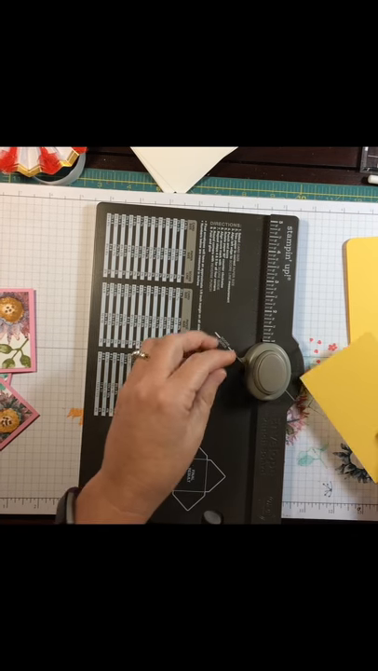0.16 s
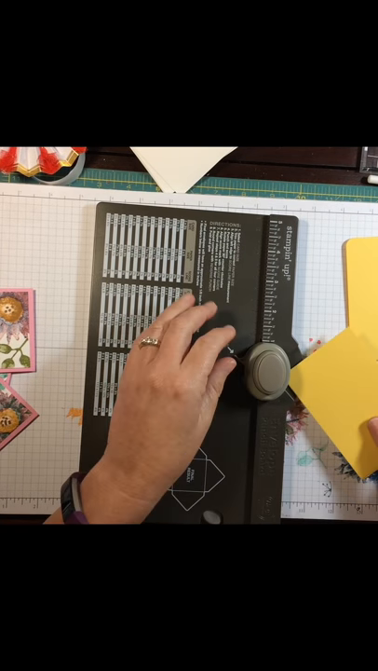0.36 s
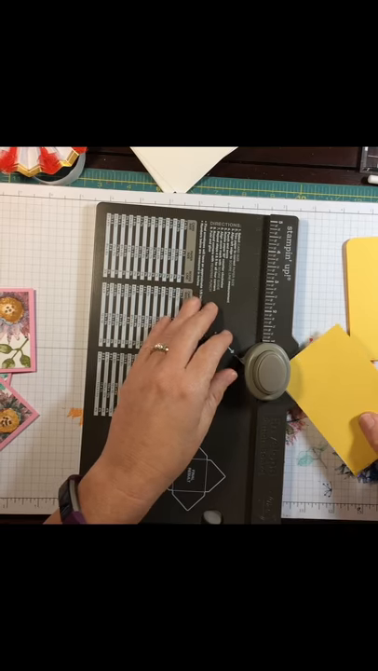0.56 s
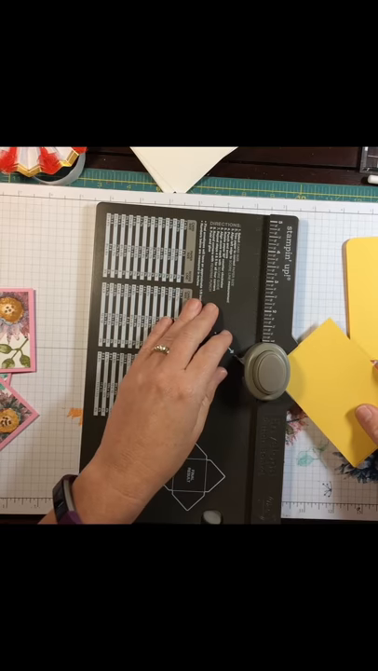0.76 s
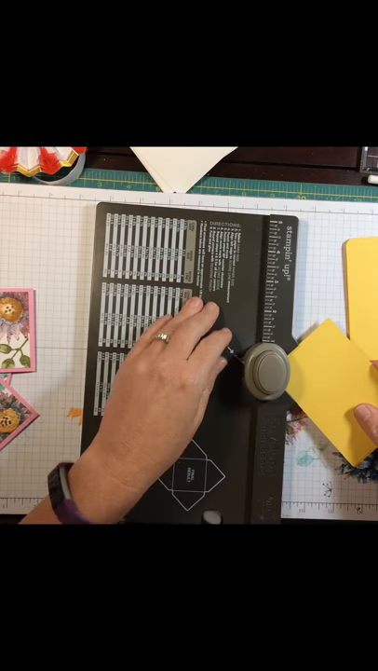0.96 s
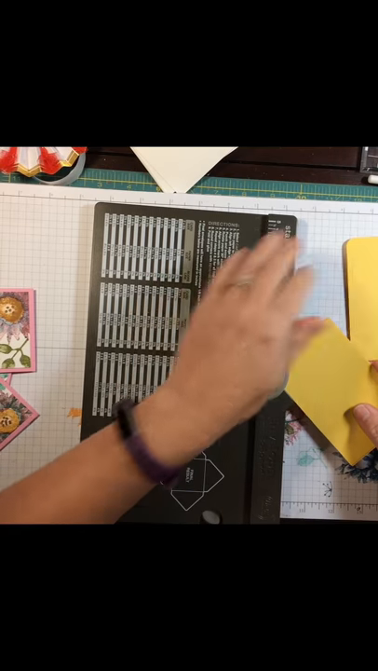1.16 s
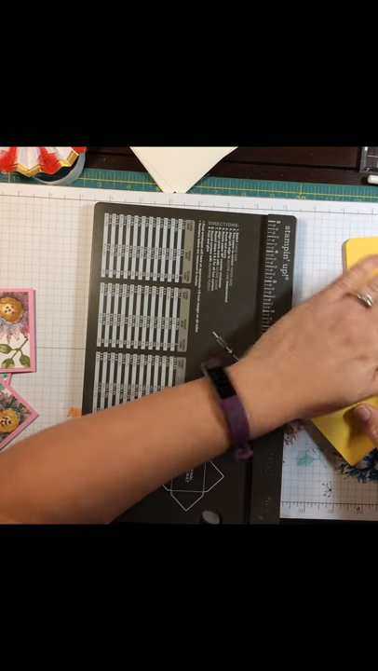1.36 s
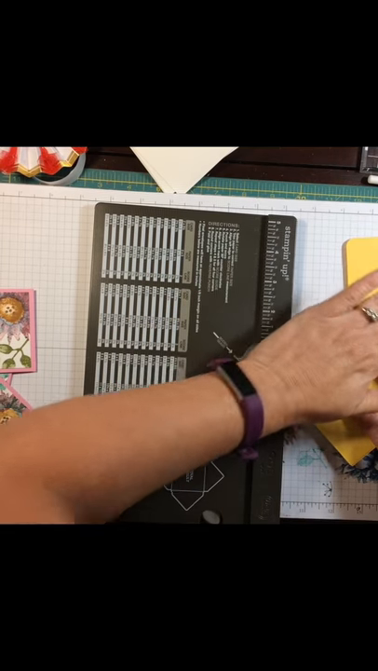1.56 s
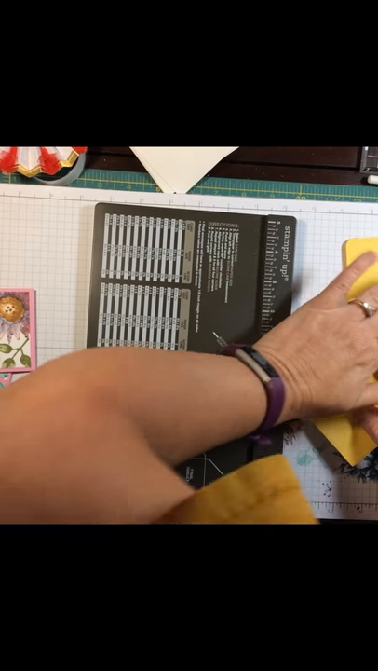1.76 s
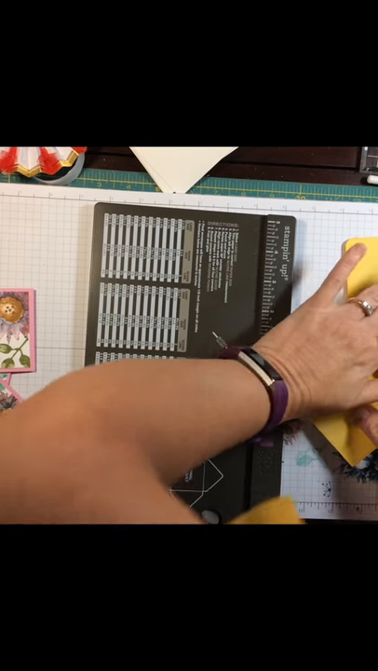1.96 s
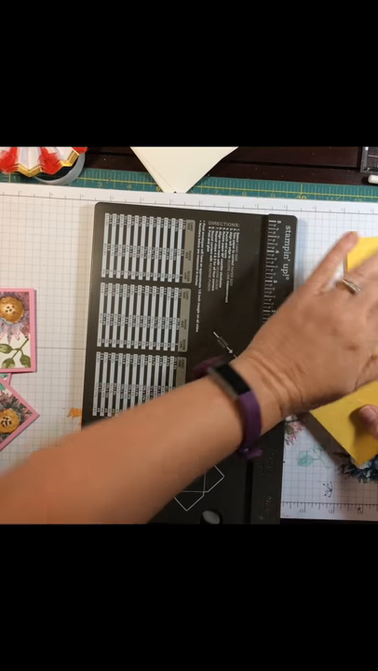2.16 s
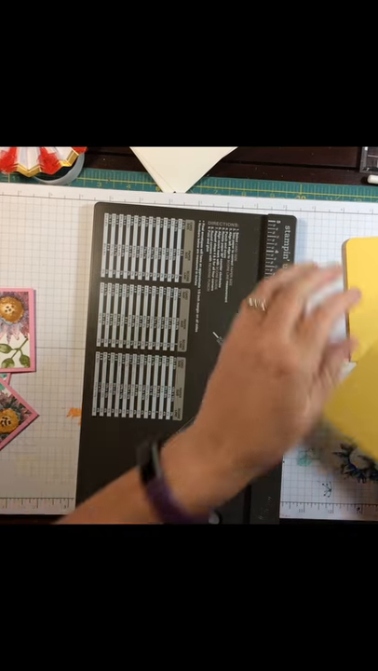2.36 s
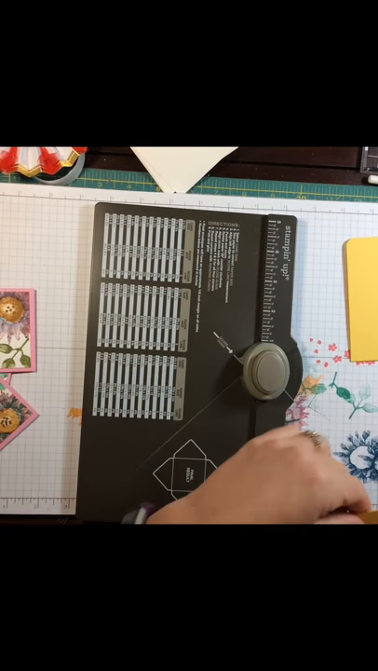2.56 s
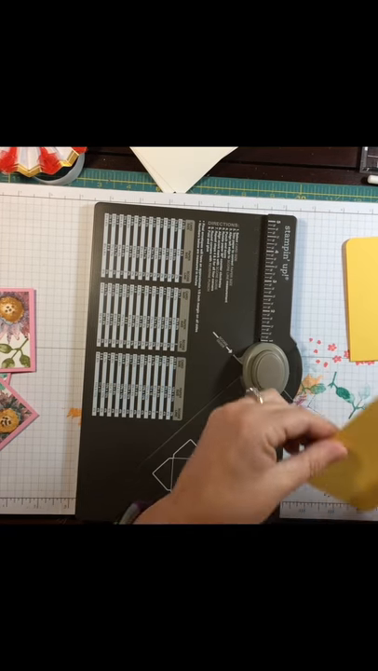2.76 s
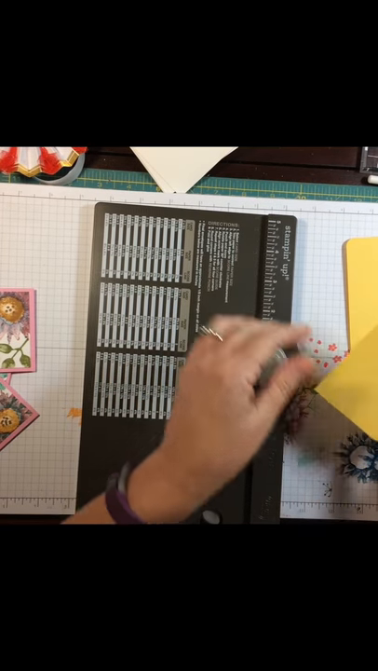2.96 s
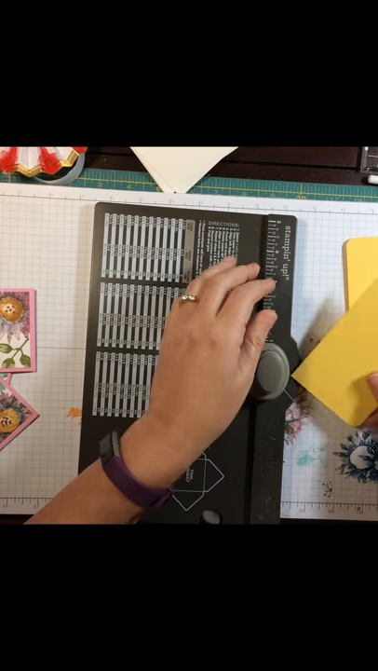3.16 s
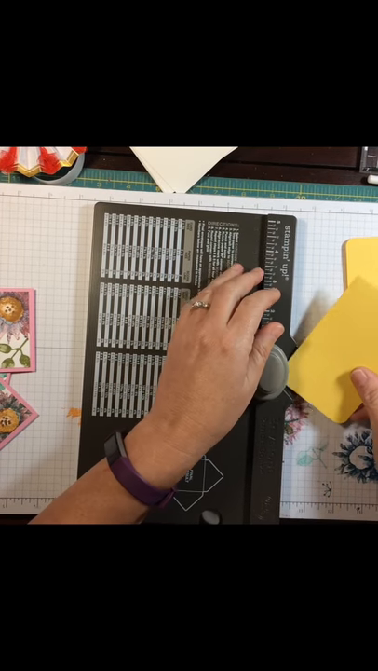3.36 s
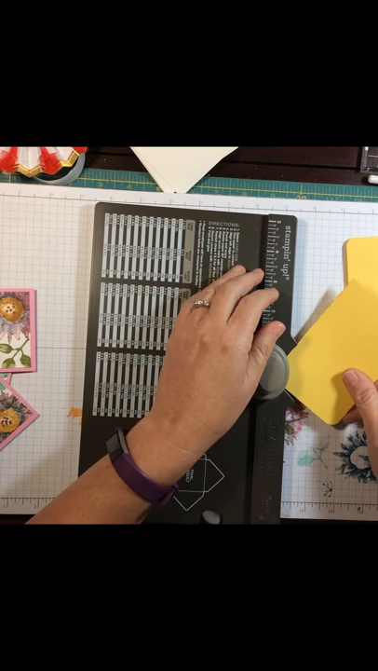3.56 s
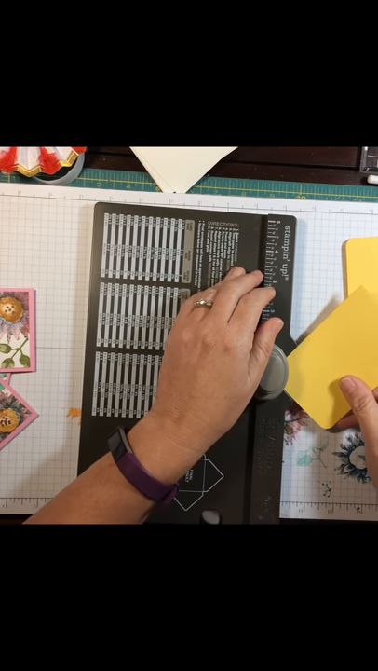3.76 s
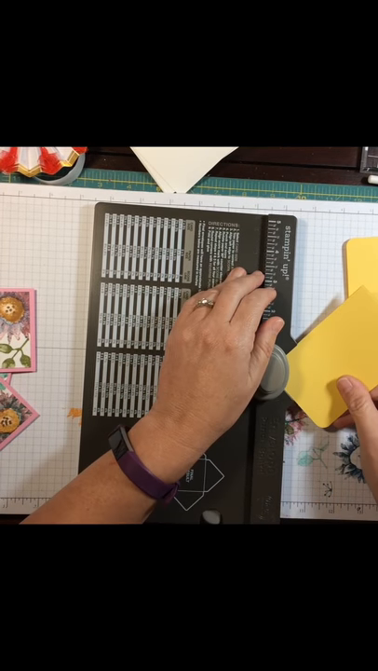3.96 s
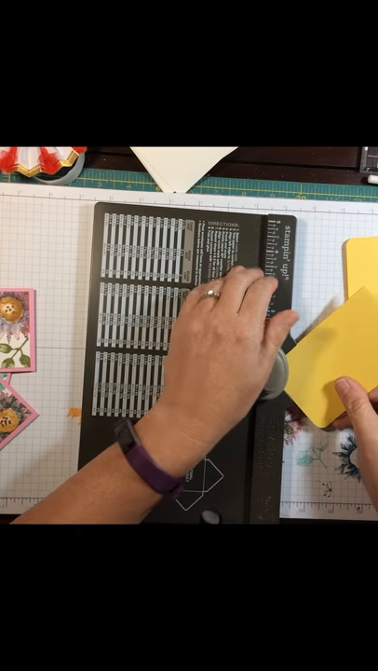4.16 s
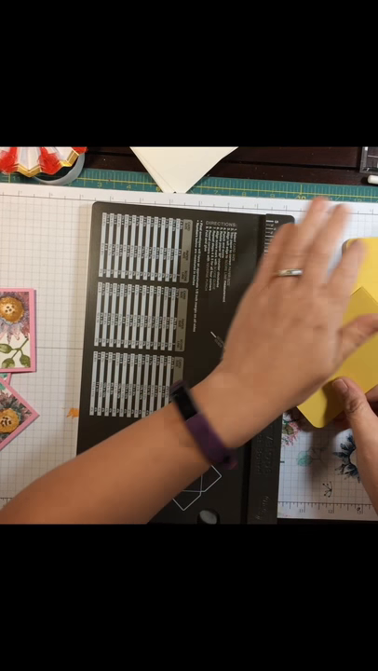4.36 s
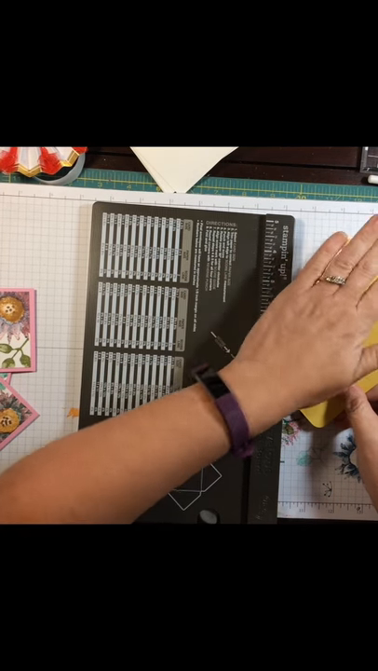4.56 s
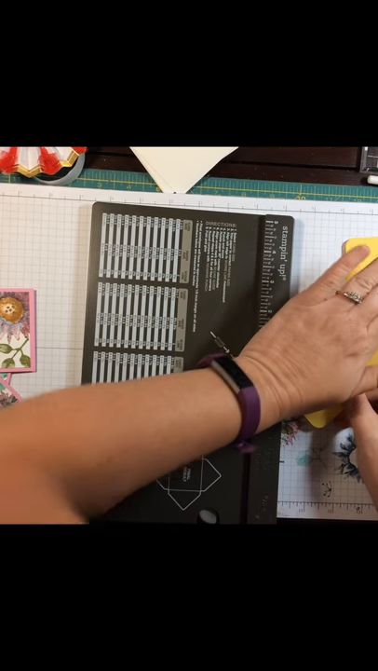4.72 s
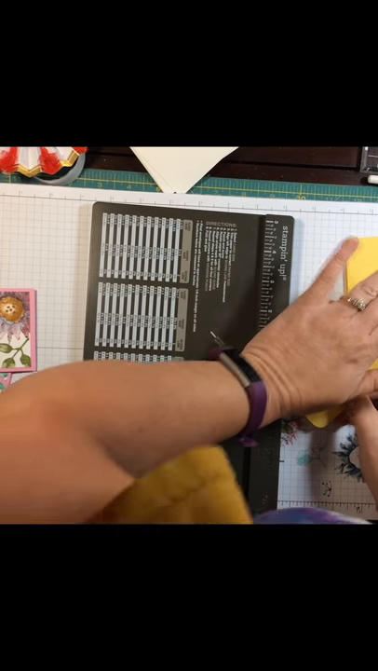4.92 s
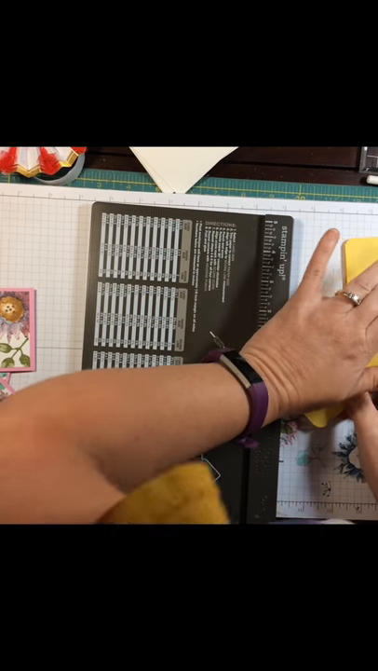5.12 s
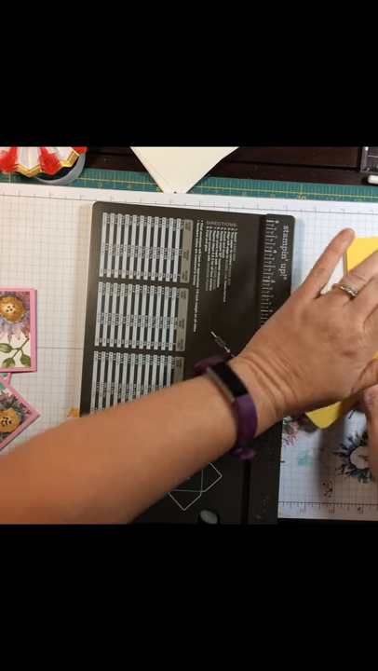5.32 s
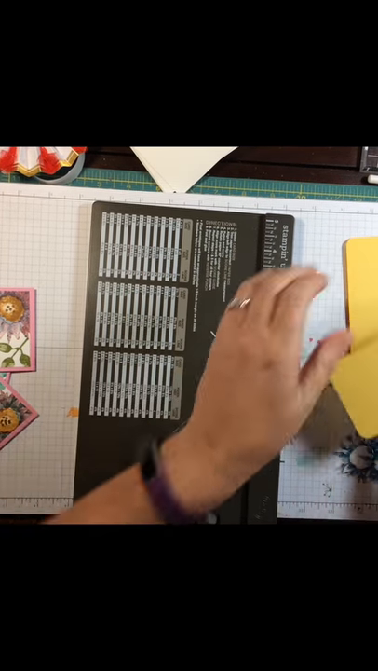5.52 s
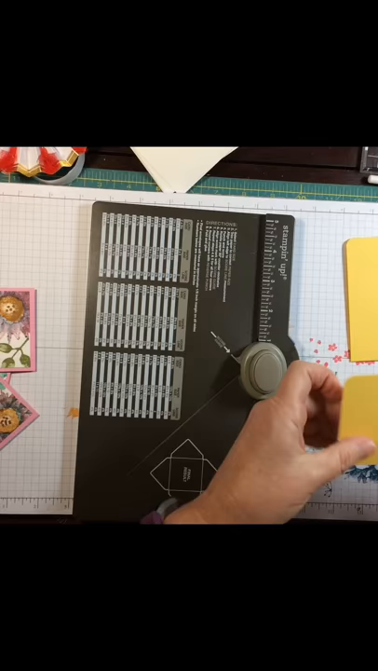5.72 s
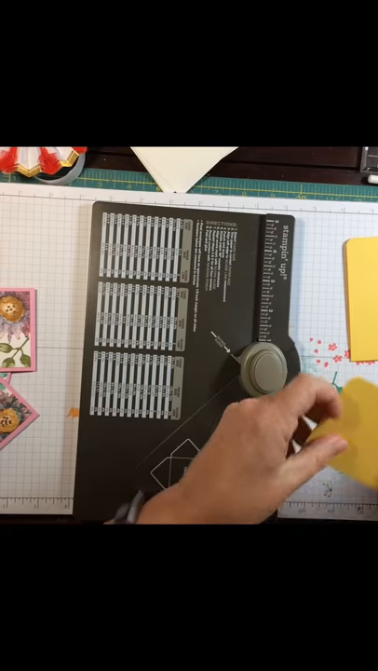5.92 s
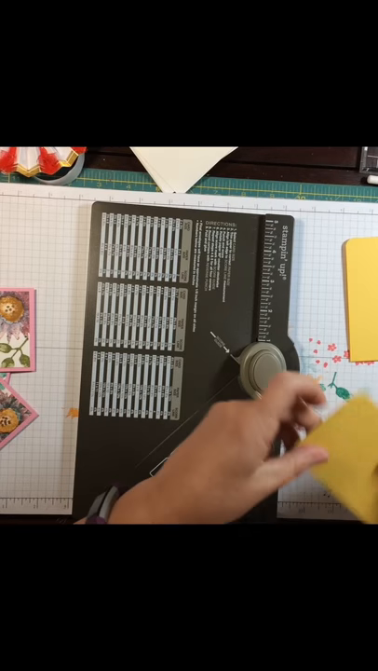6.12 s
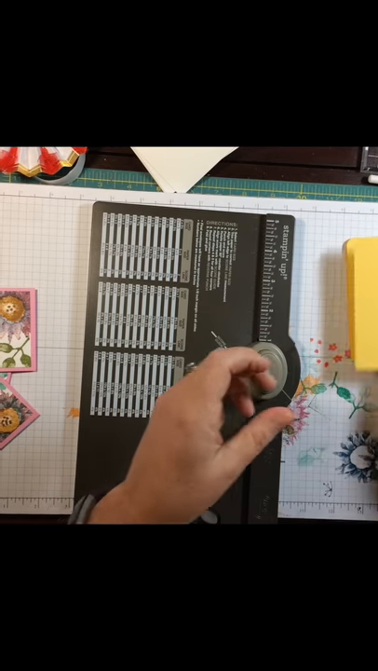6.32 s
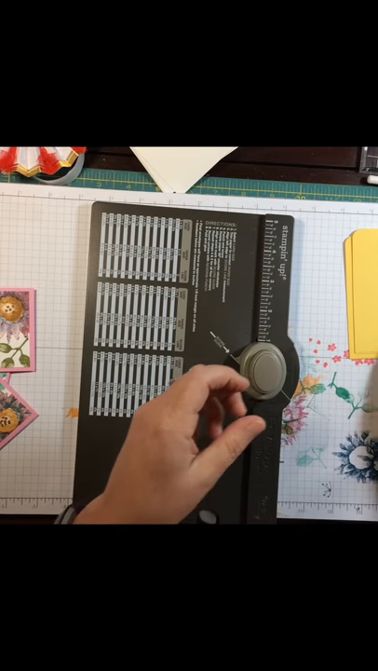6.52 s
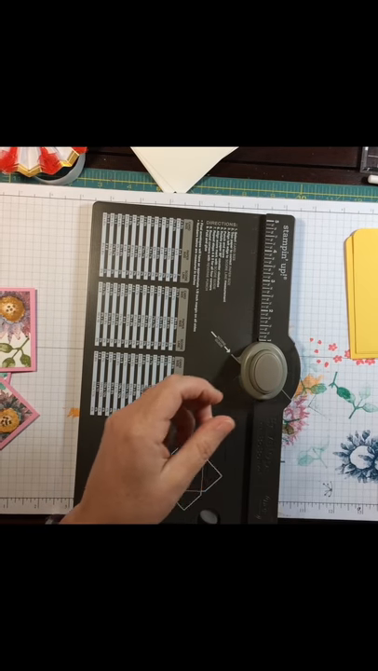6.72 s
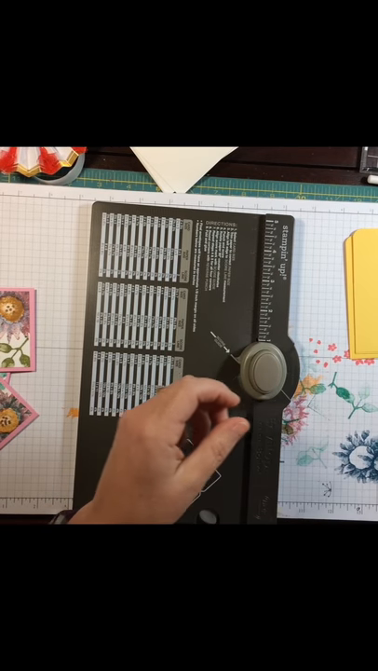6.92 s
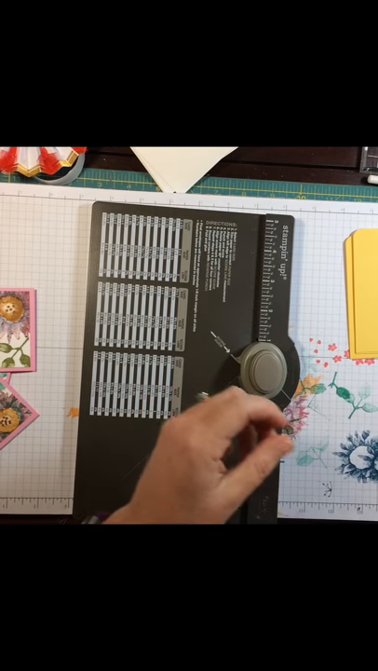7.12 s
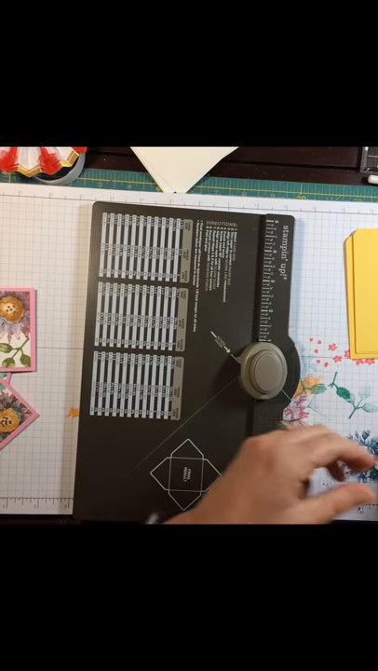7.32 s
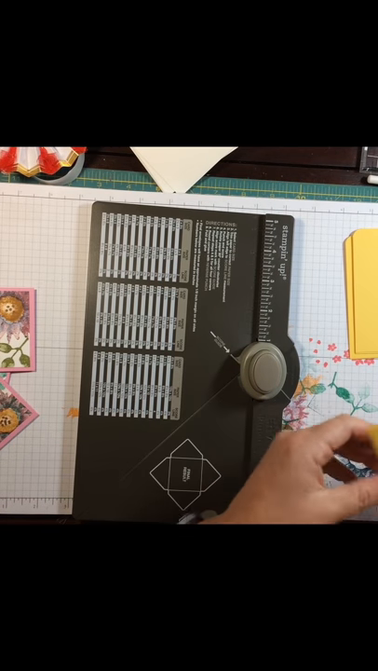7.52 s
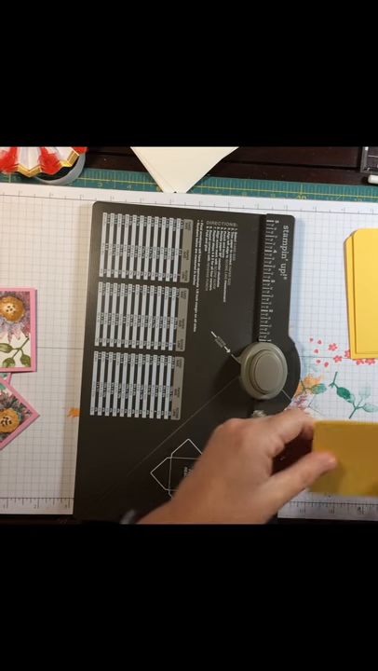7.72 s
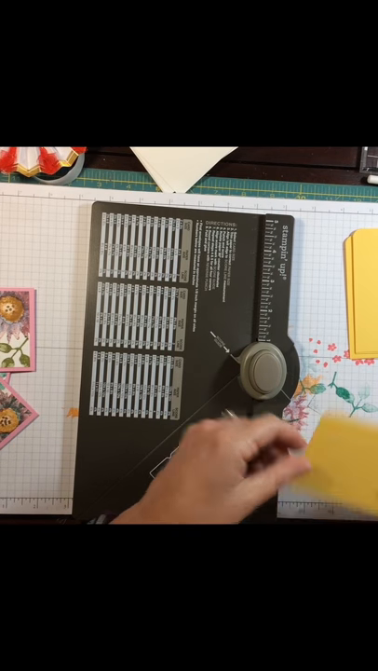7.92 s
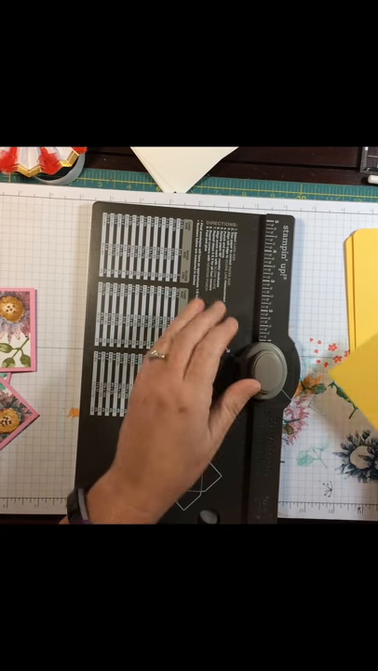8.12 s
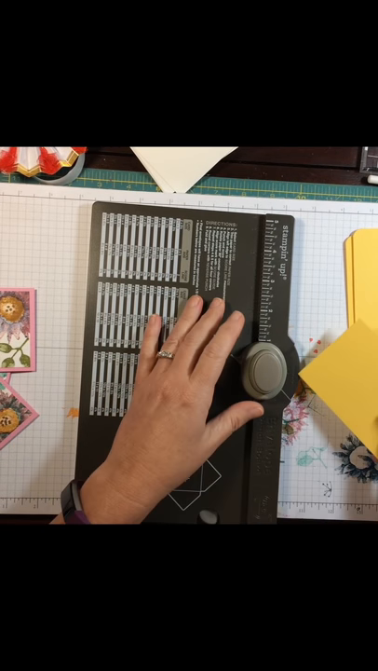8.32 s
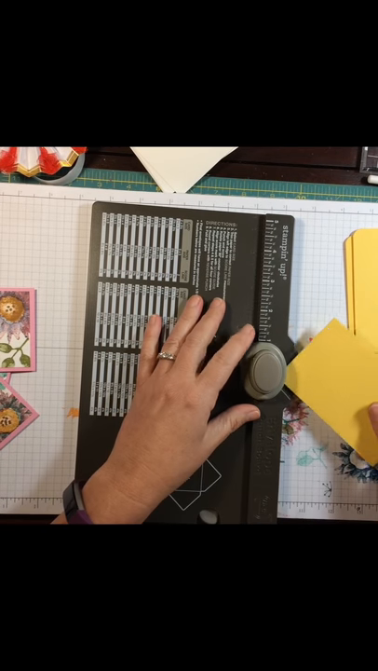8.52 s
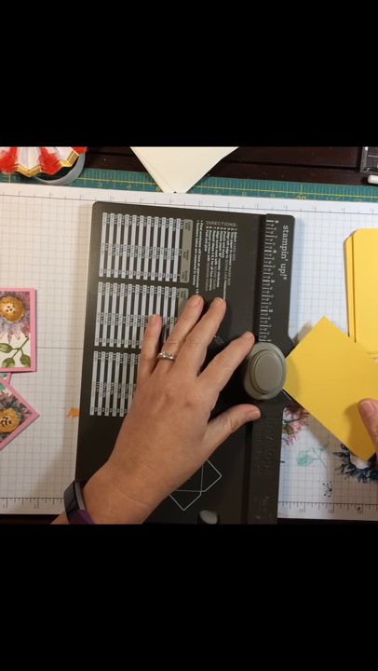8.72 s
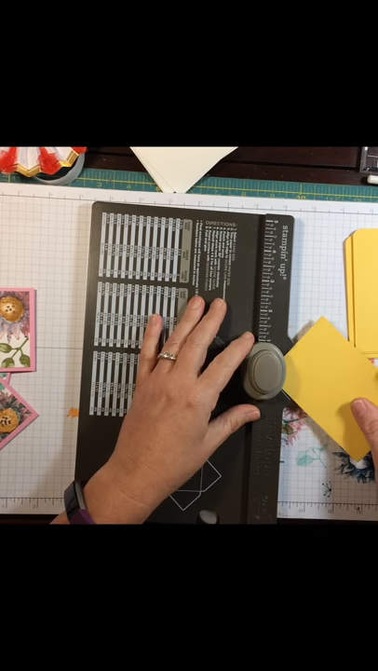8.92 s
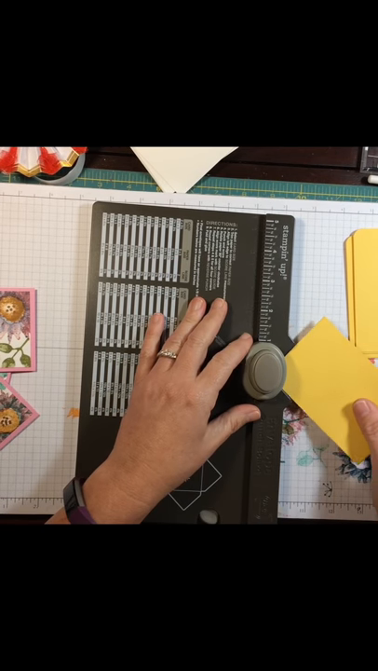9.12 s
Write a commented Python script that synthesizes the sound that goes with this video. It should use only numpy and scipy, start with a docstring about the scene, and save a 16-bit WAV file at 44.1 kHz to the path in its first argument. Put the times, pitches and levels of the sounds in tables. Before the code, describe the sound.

On a craft table in a small room, heard close up, card slides and bumps softly against a plastic board. Fingers knock dully, then a punch cracks sharply through the card with a table thud, and its button clicks back. More bumps lead to a second punch and click. Afterwards card lands on a pile, another peels off with a crackly rub, and a corner snaps brightly against the guide. Low rumble and faint hiss lie beneath.

```python
"""On a craft table in a small room, a plastic corner punch board works close to one microphone.
Twice a hand leans on the button, the die snaps through card, hits its stop and springs back up.
Around this, card slides, taps, peels off a pile and snaps off the guide, over low rumble and faint hiss.
Decaying sine waves ring the plastic, the guide and the table; filtered noise makes the cracks, rubs and hisses."""
import sys
import numpy as np
from scipy import signal
from scipy.fft import rfft, irfft
from scipy.io import wavfile
from scipy.ndimage import uniform_filter1d

SR = 44100
rng = np.random.default_rng(int(sys.argv[2]) if len(sys.argv) > 2 else 0)


def wav_record(signal):
    """Record a signal, one row per channel, as 16-bit PCM in the file named by sys.argv[1]."""
    frames = np.transpose(np.atleast_2d(signal))
    bounded = np.clip(frames, -1, 1)
    # unit amplitude maps onto the largest positive 16-bit level
    quanta = np.round(bounded * 32767).astype(np.int16)
    wavfile.write(sys.argv[1], SR, quanta)


N = 404838
TIME = np.arange(N) / SR  # s, over the whole scene
RING_SAMPLES = 16384  # length of one hit
AGE = TIME[:RING_SAMPLES]  # s since a hit began

# the die hits its stop: t/s, level/dB, time from cut to stop/s, crack level/dB, tuning of the board (factor)
PUNCH_STOPS = [(1.8242, -17, .0033, -5.5, 1.0), (5.0113, -18.3, 0.005, -1.1, 1.02)]
# card and hand come down on the pile: t/s, thud/dB, slap/dB, settling/dB, resonance of the pile f/Hz
PILE_LANDINGS = [(6.5767, -38.5, -46.5, -51, 328), (7.243, -71, -57.5, -54, 201)]
# ways the plastic board rings: f/Hz, level/dB, time to fade by 60 dB/s
BOARD_MODES = [(145, -2.5, .04), (228, -6.5, 0.059), (314, -4.5, .035), (394, -1.5, .04), (448.1, 0, 0.049),
               (525, 0.5, 0.018), (686, -1.5, 0.04), (850, -3, .03), (1040, -2.5, 0.019), (1251, -3.5, .03),
               (1574, -10, 0.018), (2030, -16, 0.025), (2400, -15.5, .02), (3065, -7.5, 0.023),
               (3230, -8.5, .018), (3605, -12.5, .018), (4530, -15.5, .015)]
# spectrum of the button's click: f/Hz, level/dB
CLICK_SPECTRUM = [(80, -34), (300, 2), (1100, -0.5), (1500, -7.5), (2100, 0.5), (2900, -9.5), (4300, -9),
                  (7000, -12), (9500, -22), (15000, -35)]
# spectrum of a tiny, bright tick: f/Hz, level/dB
TICK_SPECTRUM = [(1500, -23), (3500, 0), (5000, 0), (8000, -3.5), (12000, -9), (15000, -16)]
# spectrum of the hiss of rubbed paper fibres: f/Hz, level/dB
FIBRE_HISS = [(1500, -35), (3500, -2.5), (5000, -2), (8000, -1), (12000, -5), (15000, -9.5)]


def undb(db):
    """Turn decibels into gain."""
    return 10 ** (np.asarray(db) / 20)


def add(track, s, sound):
    """Mix a sound into a track at time s in seconds."""
    i = int(round(s * SR))
    track[i:i + len(sound)] += sound[:N - i]


def blow(x):
    """Scale a hit to the energy of 10 ms at 0 dB."""
    energy = np.sum(x ** 2)
    return x * np.sqrt(SR / 100 / energy)


def fade(t60):
    """Die away exponentially, by 60 dB in t60 seconds."""
    return np.exp(-np.log(1000) * AGE / t60)


def soften(x, corner_hz):
    """Make a contact soft: it leaves out what lies above its corner."""
    lowpass = signal.butter(2, min(corner_hz, SR * .45), fs=SR, output="sos")
    return signal.sosfilt(lowpass, x)


def walk(rate):
    """Wander smoothly at random around 0, with about rate new targets a second."""
    k = int(SR / rate)
    steps = np.repeat(rng.standard_normal(N // k + 1), k)
    return uniform_filter1d(steps, k)[:N]


def stroke(start, fastest, end):
    """Speed of a hand movement (0 to 1) that gathers pace, then stops; times in seconds."""
    return np.interp(start + TIME[:SR // 2], np.sort([start, fastest, end]), [0, 1, 0])


def response(points, size):
    """Read the gain of a spectrum at each frequency step of a transform."""
    hz, db = np.transpose(points)
    bins_hz = np.arange(size // 2 + 1) * SR / size
    return undb(np.interp(np.log(bins_hz + 1), np.log(hz), db))


def colour(x, points):
    """Give a steady sound a spectrum, at an average strength (rms) of 1."""
    y = irfft(rfft(x) * response(points, len(x)), len(x))
    return y / np.std(y)


def sheet(hz, skirt_db=-9, edge_db=-25):
    """Spectrum of a flexing card: one broad resonance that falls away on both sides."""
    return [(hz / 30, 2 * edge_db), (hz / 8, edge_db), (hz / 2, skirt_db), (hz, 0),
            (hz * 2, skirt_db * 1.5), (hz * 4, edge_db), (hz * 12, 2 * edge_db)]


def burst(points, t60, rise_s=0, size=RING_SAMPLES):
    """A dying cluster of tiny contacts: fading noise through a filter that never sounds early."""
    swell = 1 - np.exp(-(AGE + 1 / SR) / (rise_s + 1 / SR))
    grit = rfft(rng.standard_normal(size) * swell * fade(t60))
    # every frequency region gets its share of energy
    grit /= np.sqrt(uniform_filter1d(np.abs(grit) ** 2, size=300))
    # fold the log spectrum onto later times, so the filter starts at once
    cepstrum = irfft(np.log(response(points, size)))
    cepstrum[1:size // 2] *= 2
    cepstrum[size // 2 + 1:] = 0
    cluster = irfft(grit * np.exp(rfft(cepstrum)))
    taper = np.cos(np.pi / 2 * np.arange(size) / size) ** 2
    return blow(taper * cluster)


def ring(modes, corner_hz, tuning=1, scatter_db=1.24):
    """Struck modes, neighbours swinging in opposite directions; each hit favours others."""
    hz, db, t60 = np.transpose(modes)
    sizes = undb(db + scatter_db * rng.standard_normal(len(hz))) * (-1) ** np.arange(len(hz))
    t60 = np.minimum(t60, 60 / hz)  # damped: fades by 60 dB within sixty cycles
    total = np.zeros(RING_SAMPLES)
    for f, size, t in zip(hz, sizes, t60):
        total += size * fade(t) * np.sin(2 * np.pi * f * tuning * AGE)
    return blow(soften(total, corner_hz))


def table_thud(corner_hz=220):
    """The table top swings at one low pitch that dies away quickly."""
    table_hz, t60_s = 91.8, 0.041
    return blow(soften(fade(t60_s) * np.cos(2 * np.pi * table_hz * AGE), corner_hz))


def fibres(size, grain_db=3.0, crackle_spread_db=4):
    """Paper fibres catch and slip in dense grains; now and then a larger catch crackles."""
    crackle_per_s, crackle_db = 130, -8  # how often; level against the dense grain
    grain_gain = undb(grain_db * np.minimum(rng.exponential(size=size), 5))
    dense = rng.standard_normal(size) * grain_gain
    happens = rng.random(size) < crackle_per_s / SR
    catches = happens * undb(crackle_spread_db * np.clip(rng.standard_normal(size), -2, 2))
    return dense / np.std(dense) + undb(crackle_db) * np.sqrt(SR / crackle_per_s) * catches


def card_slide(rise_s, fall_s, hz, hiss_db):
    """One slide of the card: the sheet rubs and its fibres hiss, louder as it moves faster."""
    speed = stroke(0, rise_s, rise_s + fall_s)
    grains = fibres(len(speed))
    rub, hiss = colour(grains, sheet(hz)), colour(grains, FIBRE_HISS)
    return speed * (rub + undb(hiss_db) * hiss)


def tap(hz, thud_db, tick_db):
    """A tap flexes the card, thuds on the board and ticks at the card's edge."""
    # spectrum of the thud: f/Hz, level/dB
    thud_spectrum = [(40, -21), (160, -6.5), (380, 1.5), (520, -2.5), (700, -12.5), (1500, -15.5),
                     (5000, -63)]
    flap = burst(sheet(hz, skirt_db=-11, edge_db=-27.5), t60=0.031, rise_s=0.00029)
    thud = burst(thud_spectrum, t60=0.048, rise_s=.00039)
    tick = burst(TICK_SPECTRUM, t60=0.018, rise_s=0.00056)
    return flap + undb(thud_db) * thud + undb(tick_db) * tick


def knock(corner_hz, thud_db, skin_db=-13, tick_db=-27):
    """A dull knock rings the board and thuds on the table; skin sticks and slips, the loose button ticks."""
    skin = burst(sheet(corner_hz), t60=.08, rise_s=.003)
    tick = burst(CLICK_SPECTRUM, t60=.025, rise_s=.0005)
    thud = table_thud()
    return ring(BOARD_MODES, corner_hz) + undb(skin_db) * skin + undb(tick_db) * tick + undb(thud_db) * thud


def background(rumble_db=-68.3, ease_db_per_s=0.08, waver_db=0.93):
    """Steady noise: a wavering low room rumble under a narrow, high hiss; both end softer than they began."""
    # spectrum of the low rumble: f/Hz, level/dB
    rumble_spectrum = [(20, -19.5), (45, -6.5), (65, -3.5), (100, -3.5), (140, -10), (220, -17), (420, -17),
                       (700, -20), (960, -23.5), (1080, -21), (1250, -26.5), (2500, -31), (5000, -34),
                       (15000, -38.5)]
    # spectrum of the high hiss: f/Hz, level/dB
    whisper_spectrum = [(2500, -32.5), (4500, -6), (5700, -2.5), (6500, 1), (7500, -4), (9000, -10.5),
                        (15000, -27.5)]
    # loudness of the high hiss: t/s, level/dB
    whisper_levels = [(0, -76.5), (3.5, -76.5), (4.8, -78.5), (5.8, -81), (7.5, -80.5), (9.18, -82)]
    rumble_level = rumble_db - ease_db_per_s * TIME + waver_db * walk(5)
    rumble = undb(rumble_level) * colour(rng.standard_normal(N), rumble_spectrum)
    whisper_level = np.interp(TIME, *np.transpose(whisper_levels))
    whisper = undb(whisper_level) * colour(rng.standard_normal(N), whisper_spectrum)
    return rumble + whisper


def squeaks():
    """The card's edge sticks and slips fast enough to whistle faintly: noise in a narrow band."""
    # the squeaks: start t/s, loudest t/s, end t/s, level/dB
    squeak_times = [(0.435, 0.518, 0.62, -76), (5.458, 5.503, 5.53, -67)]
    # spectrum of a squeak: f/Hz, level/dB
    squeak_spectrum = [(4000, -41), (4750, -12), (5050, 0), (5350, -16), (6200, -37)]
    out = np.zeros(N)
    for start, loudest, end, db in squeak_times:
        speed = stroke(start, loudest, end)
        whistle = colour(rng.standard_normal(len(speed)), squeak_spectrum)
        add(out, start, undb(db) * speed * whistle)
    return out


def card_moves(catch_db=2.5, sheet_hz=1900, swish_s=0.05, swish_db=-60):
    """Strokes over board and mat, a swish before the first landing and the peel, all catching unevenly."""
    # the card is drawn over board and mat: fastest t/s, length/s, rub level/dB, hiss level/dB
    card_strokes = [(.6, .22, -67.5, -83), (.71, .24, -72, -86), (1.174, 0.084, -75.5, -76.5),
                    (2.31, 0.25, -74.5, -71.5), (2.769, 0.22, -82.5, -66), (3.06, 0.45, -80.5, -73.5),
                    (4.319, .15, -68, -78), (5.49, .13, -68.5, -70), (5.601, 0.16, -85, -72),
                    (5.784, .07, -68.5, -67), (5.878, 0.22, -79, -71), (6.26, .11, -78, -66.5),
                    (6.47, 0.18, -74.5, -66.5), (7.746, .3, -76, -65.5), (8.02, .1, -73, -64),
                    (8.094, 0.056, -68.5, -62.5), (8.62, 0.22, -77, -76), (8.81, 0.091, -60.5, -74),
                    (9.141, .2, -71, -77)]
    out = np.zeros(N)
    for s, length, rub_db, hiss_db in card_strokes:
        rise = .42 * length  # share of a stroke spent gathering pace
        add(out, s - rise, undb(rub_db) * card_slide(rise, length - rise, sheet_hz, hiss_db - rub_db))
    swish = card_slide(swish_s, fall_s=0.023, hz=2220, hiss_db=-1)
    add(out, PILE_LANDINGS[0][0] - swish_s, undb(swish_db) * swish)
    return (out + peel()) * undb(catch_db * walk(130))


def card_contacts(edge_lead_s=.0048, edge_db=-5):
    """Soft bumps with a scrape, crisp flicks, and landings that touch edge first and then settle."""
    # the card's corner is pushed against the board: t/s, level/dB, flap resonance f/Hz, scrape level/dB
    corner_bumps = [(0.903, -63, 2140, -87), (2.259, -63, 2130, -80), (2.637, -58.5, 1260, -69),
                    (2.987, -65, 1085, -91), (3.217, -60, 1800, -67), (3.4765, -55, 1930, -61),
                    (3.9262, -49.5, 1290, -67), (4.1774, -66.5, 2180, -80), (8.8231, -54, 1490, -61.5)]
    # the card's edge flicks off a finger or another card: t/s, level/dB, flap resonance f/Hz
    edge_flicks = [(2.9092, -57.5, 1740), (5.8375, -63.5, 3380), (6.1306, -63, 1690), (6.1549, -65, 1900),
                   (6.4827, -50.5, 1660), (6.9216, -65.5, 2800), (6.9714, -68, 3000), (7.3778, -52, 3970),
                   (7.5404, -64, 1090), (7.669, -65.5, 1800), (7.726, -65.5, 1800)]
    scrape_lead_s, scrape_peak_s, scrape_end_s = .028, 0.0047, 0.062  # around the bump
    out = np.zeros(N)
    for s, db, hz, scrape_db in corner_bumps:
        add(out, s, undb(db) * tap(hz, thud_db=-11, tick_db=-14))
        scrape = card_slide(scrape_lead_s + scrape_peak_s, scrape_end_s - scrape_peak_s, hz=1700, hiss_db=-9)
        add(out, s - scrape_lead_s, undb(scrape_db) * scrape)
    for s, db, hz in edge_flicks:
        add(out, s, undb(db) * tap(hz, thud_db=-9.5, tick_db=0))
    for s, thud_db, slap_db, settle_db, hz in PILE_LANDINGS:
        add(out, s - edge_lead_s, undb(slap_db + edge_db) * tap(hz=1700, thud_db=-3, tick_db=0))
        add(out, s, undb(slap_db) * tap(hz=2290, thud_db=thud_db - slap_db, tick_db=1.5))
        settling = burst(sheet(hz, skirt_db=-15.5, edge_db=-27), t60=0.11, rise_s=.004)
        add(out, s, undb(settle_db) * settling)
    return out


def hand():
    """The hand settles on the button; nearer the cut it leans harder and each knock goes more into the table."""
    # fingers land on the board and its button: t/s, level/dB, contact corner f/Hz
    finger_knocks = [(1.531, -55.5, 745), (1.597, -62, 700), (1.665, -59, 750), (1.724, -55.5, 1410),
                     (1.755, -57.5, 1802), (4.653, -53.5, 1000), (4.672, -60, 1304), (4.813, -60, 600),
                     (4.897, -41, 1055)]
    lean_thud_db, lean_db_per_s = 10, 70
    out = np.zeros(N)
    for s, db, corner_hz in finger_knocks:
        wait_s = min(abs(punch[0] - s) for punch in PUNCH_STOPS)
        thud_db = lean_thud_db - lean_db_per_s * wait_s
        add(out, s, undb(db) * knock(corner_hz, thud_db, tick_db=-17))
    return out


def die_in_card(load_s=.2, load_db=-65, flex_s=0.075, unload_s=.01, flex_db=-46, touch_db=-51.0, dent_db=-45):
    """Around every cut: the table flexes, the loaded card creaks, the die touches and dents it, the chip drops."""
    touch_lead_s, dent_lead_s = .0238, 0.014  # before the stop
    chip_fall_s, chip_bounce_s = .0765, .0167  # the cut chip lands, then bounces once
    chip_db, bounce_db = -54, -15  # the bounce is relative to the landing
    out = np.zeros(N)
    for s, *_ in PUNCH_STOPS:
        load = stroke(0, flex_s, flex_s + unload_s)
        flexing = colour(rng.standard_normal(len(load)), sheet(40, skirt_db=-12, edge_db=-34))
        add(out, s - flex_s, undb(flex_db) * load * flexing)
        creak = card_slide(load_s, fall_s=.005, hz=300, hiss_db=-18)
        add(out, s - load_s, undb(load_db) * creak)
        touch = knock(corner_hz=1100, thud_db=0, skin_db=-15)
        add(out, s - touch_lead_s, undb(touch_db) * touch)
        dent = knock(corner_hz=330, thud_db=9.5, skin_db=-15.5)
        add(out, s - dent_lead_s, undb(dent_db) * dent)
        for delay, db in (chip_fall_s, chip_db), (chip_fall_s + chip_bounce_s, chip_db + bounce_db):
            add(out, s + delay, undb(db) * burst(TICK_SPECTRUM, t60=0.014, rise_s=.0004))
    return out


def punches(cut_db=-1, cut_crack_db=-11, recoil_db=-3, stop_db=-2, thud_db=-4.5, rattle_db=-9.0):
    """The card gives way and the unloaded board recoils; the die slams into its stop and the table top rattles."""
    # spectrum of the sharp crack: f/Hz, level/dB
    crack_spectrum = [(60, -24), (300, -8), (600, 12), (1200, 3), (1800, -2.5), (3300, -1), (5000, -7),
                      (9000, -12), (15000, -21)]
    # spectrum of the table's rattle: f/Hz, level/dB
    rattle_spectrum = [(40, -9.5), (80, 1), (160, 5.5), (280, -3), (440, 1.5), (750, -4.5), (1300, -9),
                       (1700, -11), (2300, -8), (3500, -16), (6000, -20), (9000, -25), (15000, -33.5)]
    crack_t60_s = .017
    out = np.zeros(N)
    for s, db, lead, crack_db, tuning in PUNCH_STOPS:
        cut = undb(cut_db) * ring(BOARD_MODES, corner_hz=1500, tuning=tuning)
        recoil = -undb(recoil_db) * table_thud()  # swings the opposite way
        cut_crack = undb(crack_db + cut_crack_db) * burst(crack_spectrum, crack_t60_s)
        add(out, s - lead, undb(db) * (cut + recoil + cut_crack))
        stop = undb(stop_db) * ring(BOARD_MODES, corner_hz=9000, tuning=tuning)
        thud = undb(thud_db) * table_thud()
        stop_crack = undb(crack_db) * burst(crack_spectrum, crack_t60_s)
        add(out, s, undb(db) * (stop + thud + stop_crack))
        add(out, s, undb(db + rattle_db) * burst(rattle_spectrum, t60=.17, rise_s=0.022))
    return out


def button(drag_db=-59.5, free_db=-61):
    """The spring drags the die up and free of the card; the button clicks and knocks into its seat."""
    # the button springs back: t/s, click level/dB, seating knock level/dB
    spring_backs = [(2.1814, -38.5, -38.5), (5.3776, -36, -40.5)]
    drag_s, free_lead_s, seat_delay_s = .06, 0.015, .0055
    out = np.zeros(N)
    for s, click_db, seat_db in spring_backs:
        add(out, s - drag_s, undb(drag_db) * card_slide(drag_s, fall_s=.01, hz=1295, hiss_db=-8))
        add(out, s - free_lead_s, undb(free_db) * tap(hz=1500, thud_db=10.5, tick_db=-7))
        add(out, s, undb(click_db) * burst(CLICK_SPECTRUM, t60=0.029))
        add(out, s + seat_delay_s, undb(seat_db) * ring(BOARD_MODES, corner_hz=1390))
    return out


def peel(rub_db=-2.5, hiss_db=-3, buzz_db=-6):
    """A bent card drags off the pile: a brighter, cracklier rub with a narrow buzz of the stiffened sheet."""
    # the peel, before the overall rub and hiss gains: t/s, rub level/dB, hiss level/dB
    peel_levels = [(6.93, -72, -73), (6.96, -73, -66), (6.974, -54, -73), (6.988, -65.5, -80),
                   (7.062, -61, -61), (7.09, -70.5, -80), (7.192, -65.5, -74), (7.228, -45.5, -62),
                   (7.248, -50, -61), (7.264, -67, -80), (7.32, -74, -73), (7.388, -53, -53),
                   (7.4, -80, -75), (7.48, -85, -77)]
    buzz_hz, buzz_q = 3180, 6.5  # resonance of the bent sheet and its sharpness
    s, rub_levels, hiss_levels = np.transpose(peel_levels)
    # silent before and after the peel
    rub = undb(np.interp(TIME, s, rub_levels, left=-np.inf, right=-np.inf))
    hiss = undb(np.interp(TIME, s, hiss_levels, left=-np.inf, right=-np.inf))
    grains = fibres(N, grain_db=4.0)
    buzz = signal.lfilter(*signal.iirpeak(buzz_hz, buzz_q, fs=SR), grains)
    body = colour(grains, sheet(2560, skirt_db=-3, edge_db=-13.5)) + undb(buzz_db) * buzz / np.std(buzz)
    rubbing = undb(rub_db) * rub * body / np.std(body)
    return rubbing + undb(hiss_db) * hiss * colour(grains, FIBRE_HISS)


def corner_snaps(tick_db=-18, flutter_db=-20):
    """A bent corner slips off and rings the guide; the sheet flutters after it."""
    # the card's corner snaps against the guide: t/s, level/dB
    snap_times = [(9.0314, -38), (9.033, -33.5), (9.0375, -57), (9.041, -50)]
    # ways the guide rings: f/Hz, level/dB, time to fade by 60 dB/s
    guide_modes = [(859, -18, 0.013), (1630, -5.5, .011), (2050, -2, 0.0063), (2500, 0, 0.0088),
                   (3420, -1.5, 0.0066), (4270, -12.5, 0.011), (4900, -10, 0.0066)]
    out = np.zeros(N)
    for s, db in snap_times:
        snap = ring(guide_modes, corner_hz=12000)
        tick = undb(tick_db) * burst(TICK_SPECTRUM, t60=0.0092)
        flutter = undb(flutter_db) * burst(sheet(2550, skirt_db=-8, edge_db=-25), t60=0.29, rise_s=0.0073)
        add(out, s, undb(db) * (snap + tick + flutter))
    return out


def room(x, t60_low=.31, t60_high=.26, build_s=0.012):
    """Blurred reflections that build up quickly and lose their treble first."""
    # spectrum of the reflections: f/Hz, level/dB
    room_spectrum = [(40, -16), (90, -7.5), (160, -2), (300, -0.5), (700, -4), (1200, -3.5), (2200, 1),
                     (3500, 1), (6000, 1.5), (15000, -4)]
    noise = colour(rng.standard_normal(len(AGE)), room_spectrum)
    low = soften(noise, corner_hz=3000)
    build_up = 1 - np.exp(-(AGE / build_s) ** 2)
    tail = (low * fade(t60_low) + (noise - low) * fade(t60_high)) * build_up
    return signal.fftconvolve(x, tail / np.sqrt(np.sum(tail ** 2)))[:N]


def scene(board_room_db=-19, card_room_db=-21):
    """Board and card lie close to the microphone, so the room stays faint."""
    card = squeaks() + card_moves() + card_contacts()
    board = hand() + die_in_card() + punches() + button()
    reflections = room(undb(board_room_db) * board + undb(card_room_db) * card)
    return (background() + card + board + corner_snaps() + reflections)[None]


def record(dry):
    """The microphone thins the deep bass, rounds the highest peaks and cuts the top."""
    highpass = signal.butter(2, 45, "high", fs=SR, output="sos")
    rounded = np.tanh(1.165 * signal.sosfilt(highpass, dry)) / 1.148
    top_cut = signal.ellip(10, .2, 70, 15400, fs=SR, output="sos")  # steep, above 15400 Hz
    return signal.sosfilt(top_cut, rounded)


dry = scene()
out = record(dry)
wav_record(out)
```